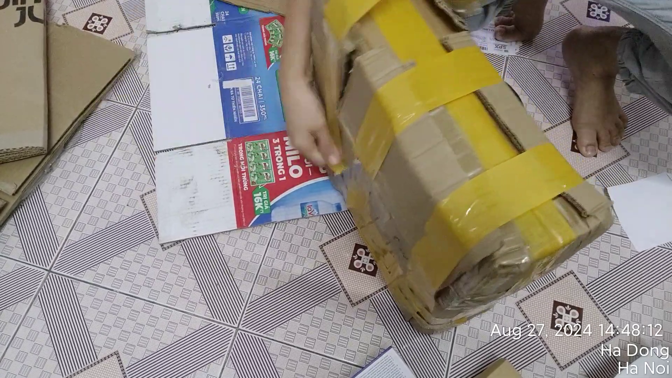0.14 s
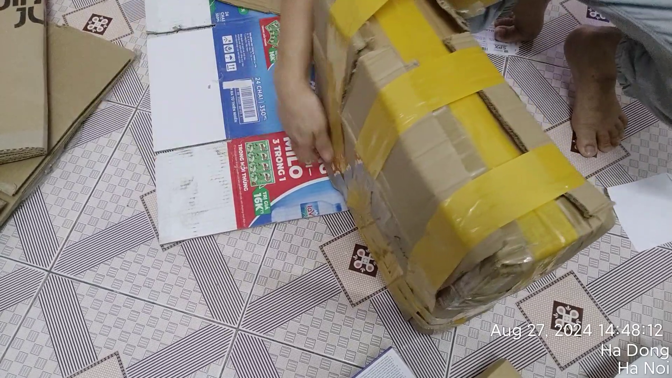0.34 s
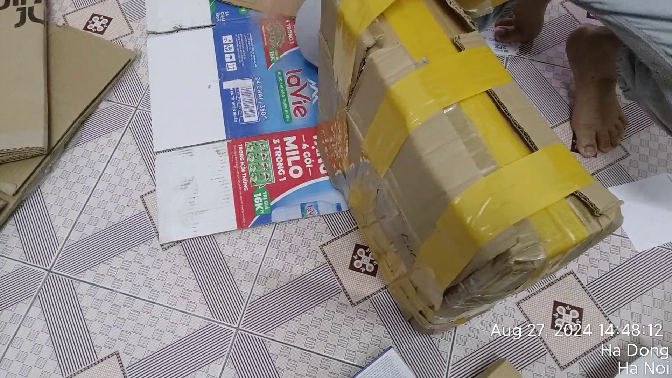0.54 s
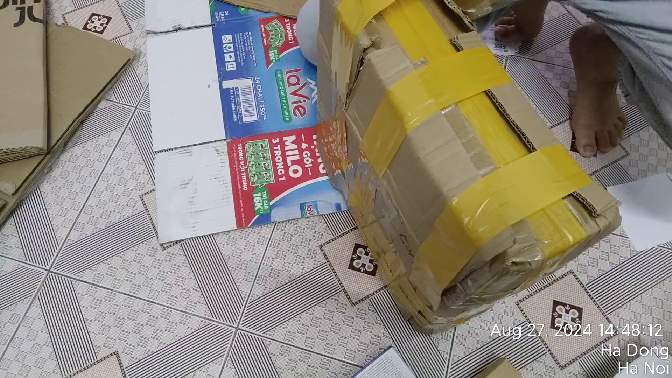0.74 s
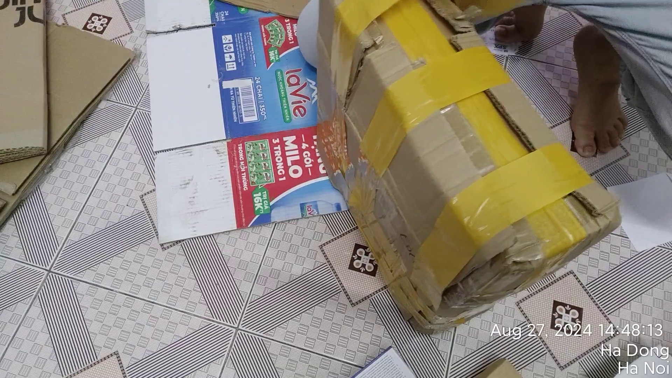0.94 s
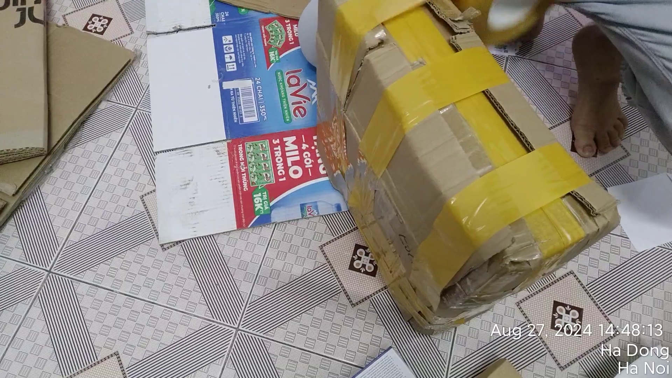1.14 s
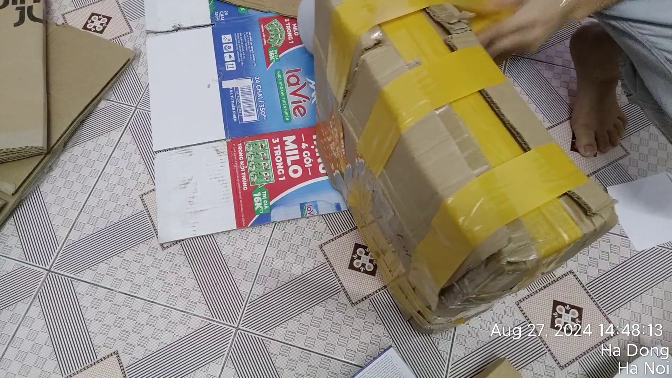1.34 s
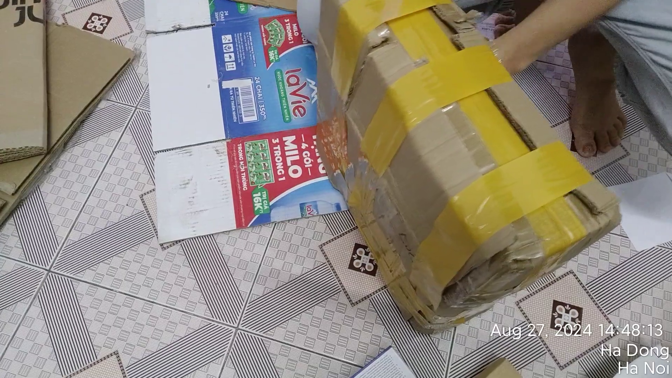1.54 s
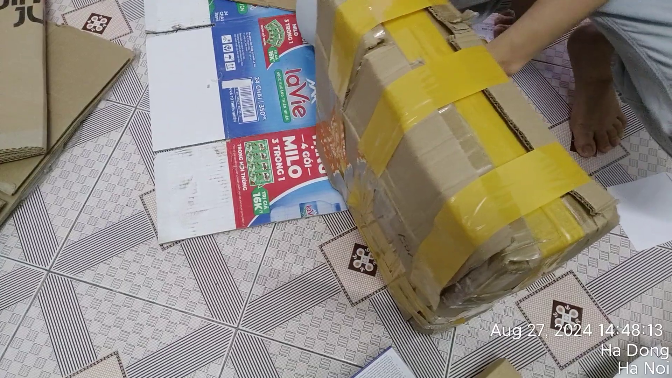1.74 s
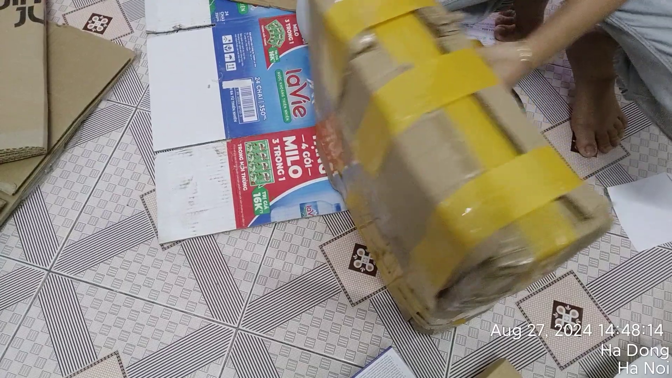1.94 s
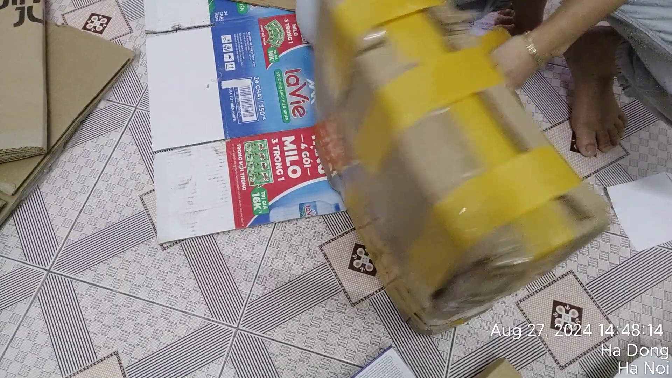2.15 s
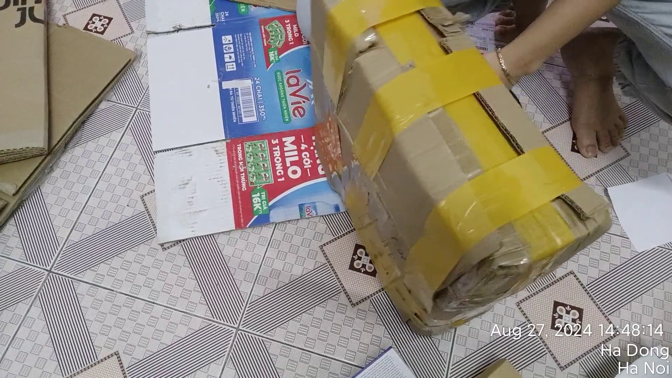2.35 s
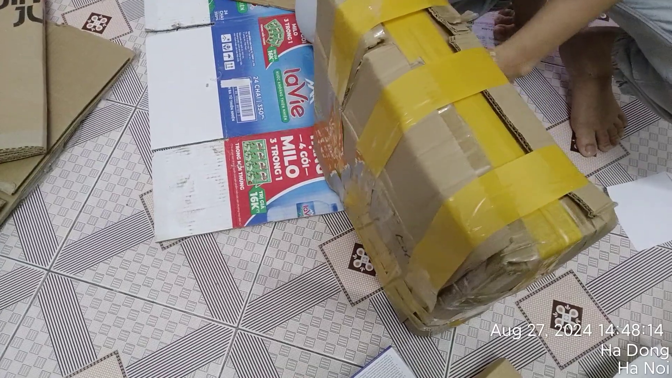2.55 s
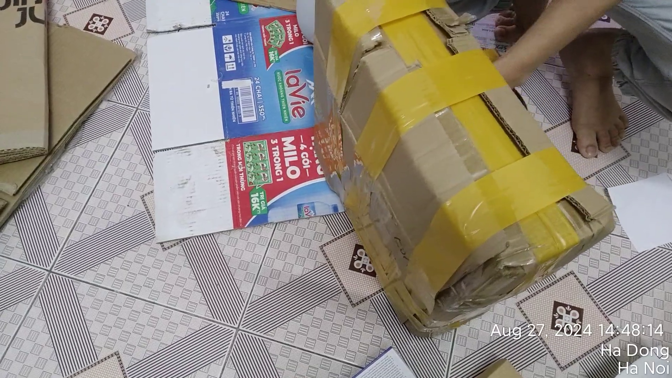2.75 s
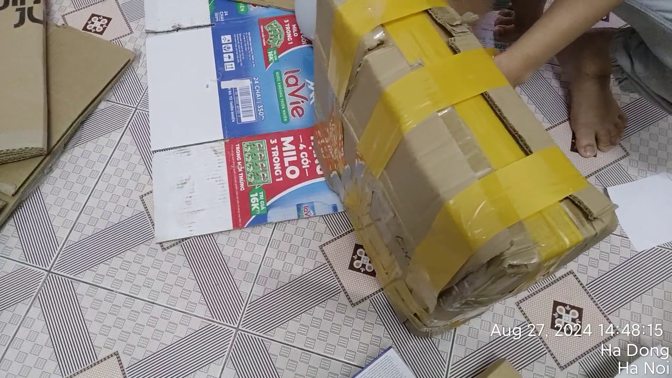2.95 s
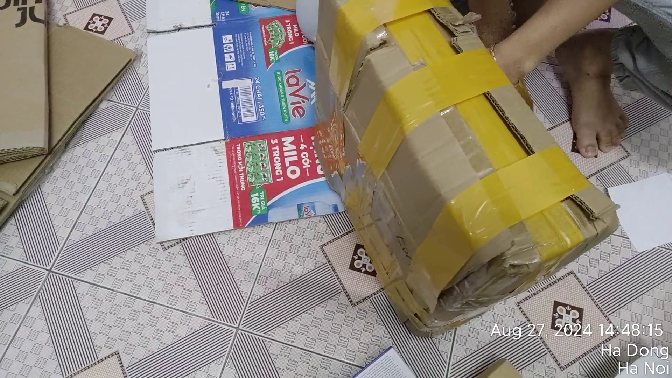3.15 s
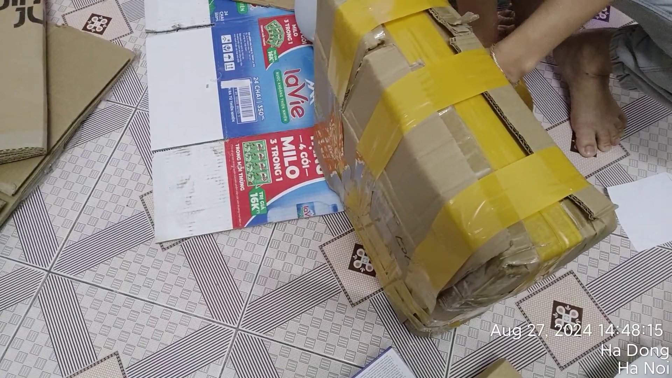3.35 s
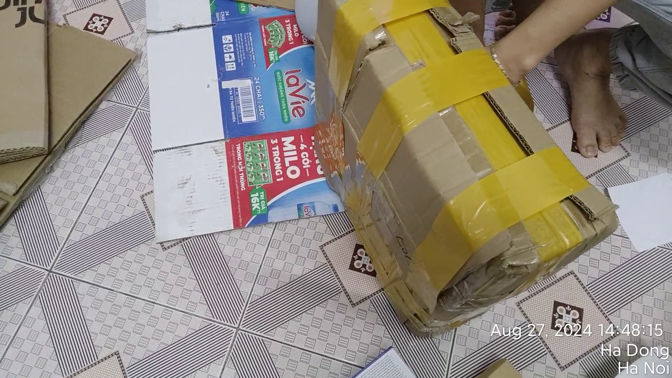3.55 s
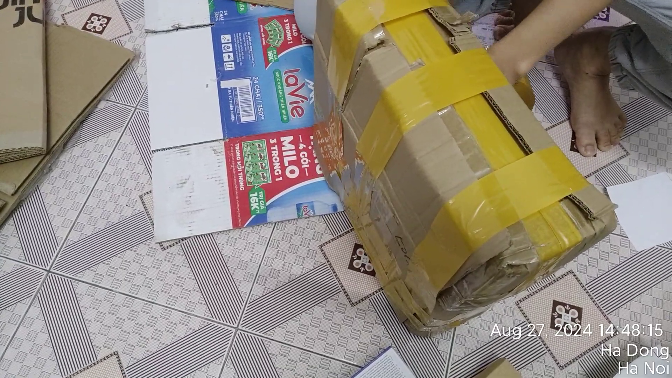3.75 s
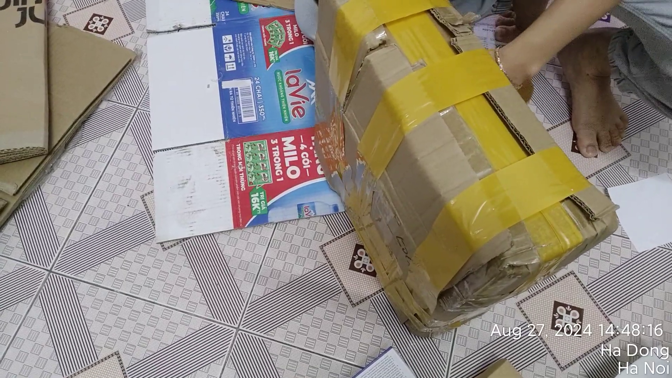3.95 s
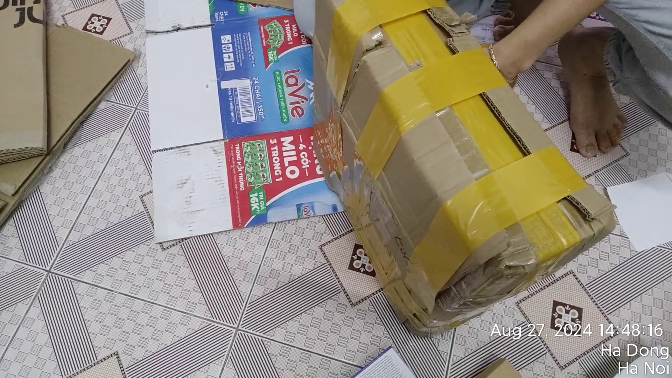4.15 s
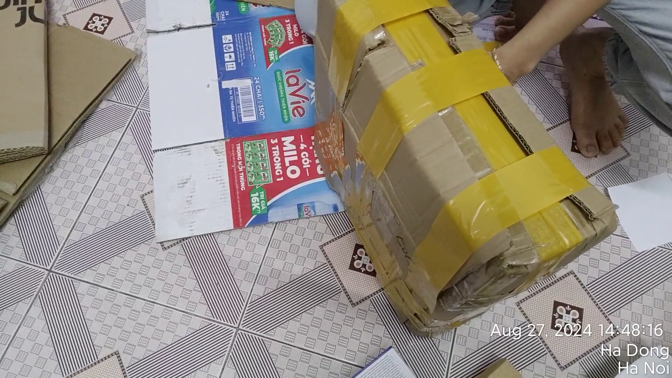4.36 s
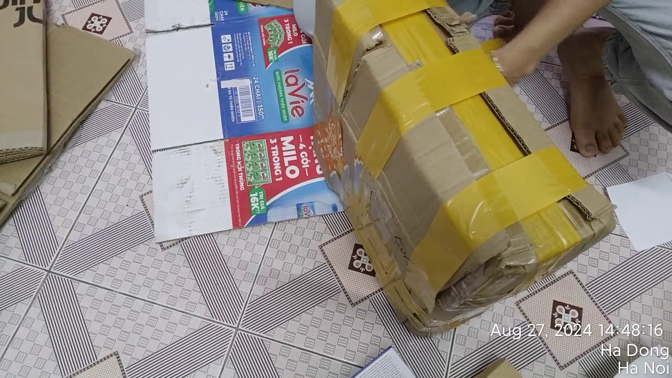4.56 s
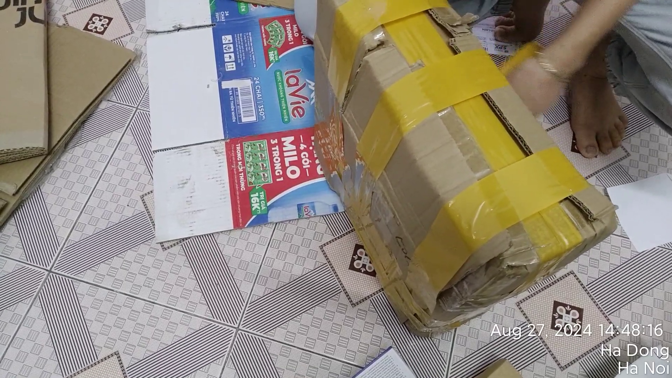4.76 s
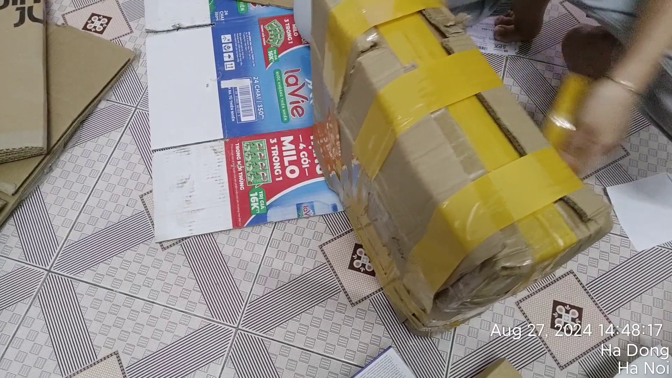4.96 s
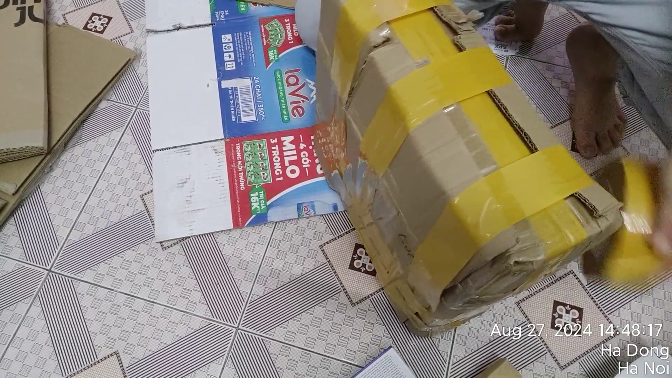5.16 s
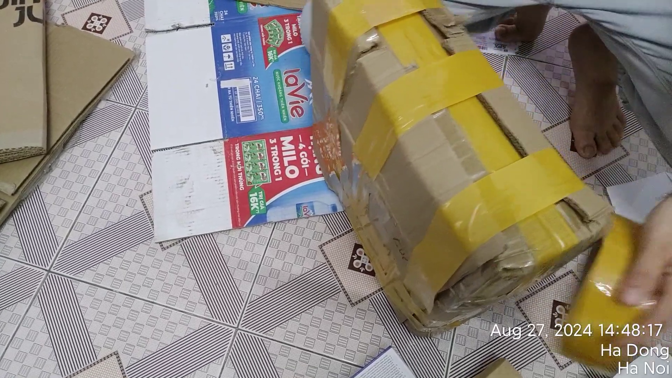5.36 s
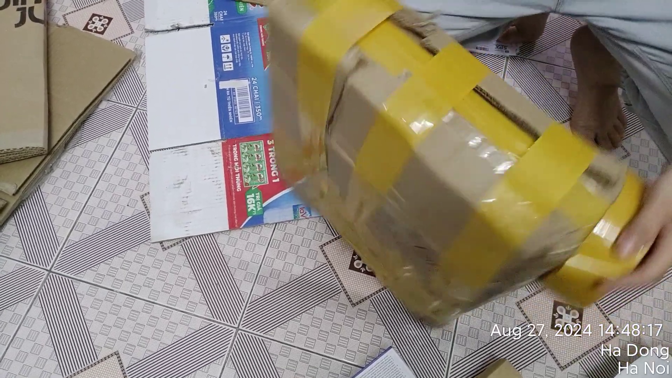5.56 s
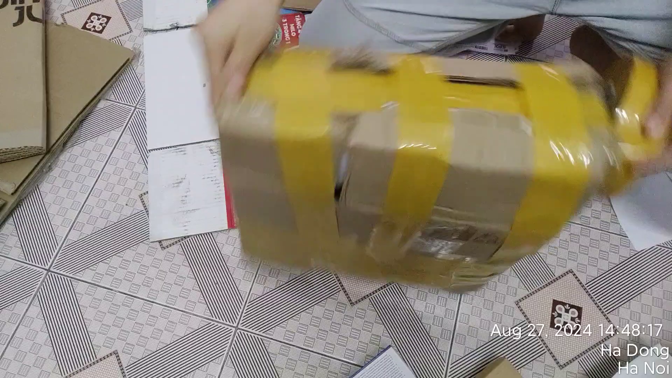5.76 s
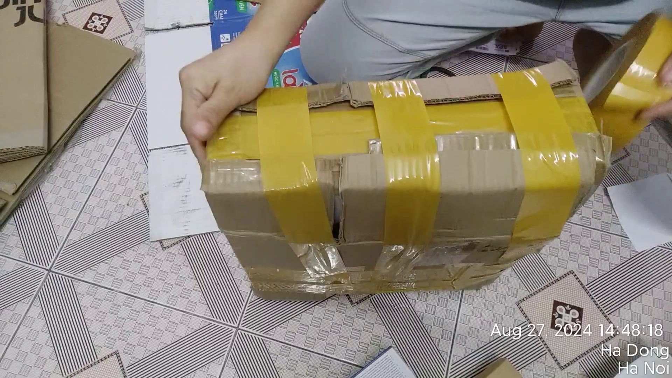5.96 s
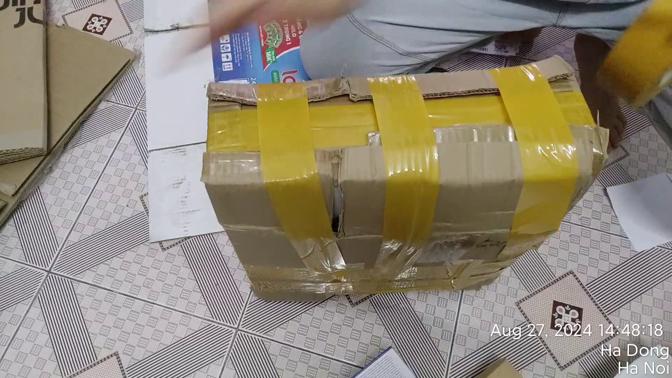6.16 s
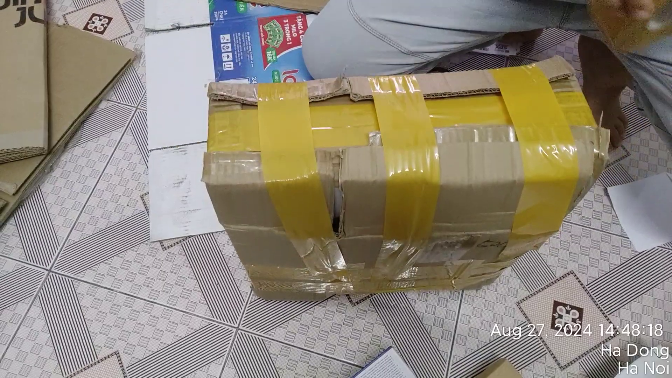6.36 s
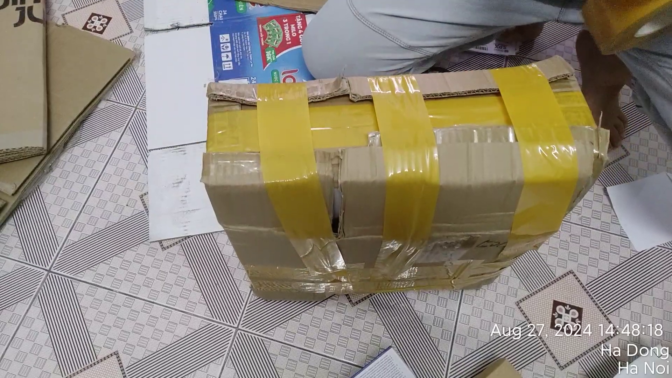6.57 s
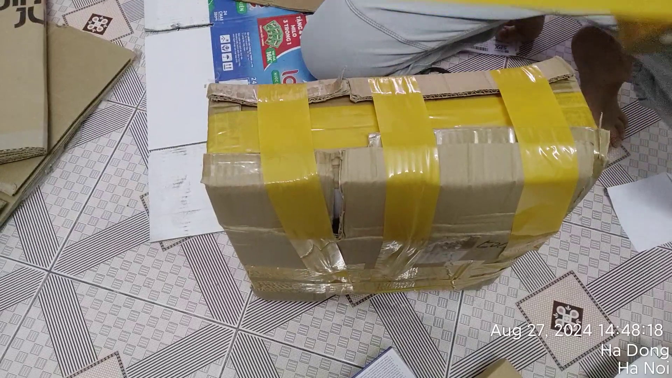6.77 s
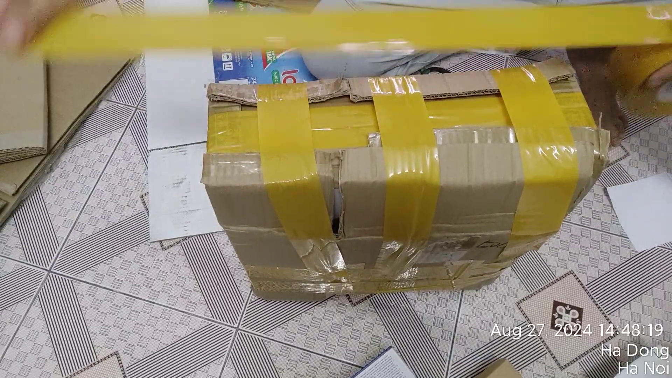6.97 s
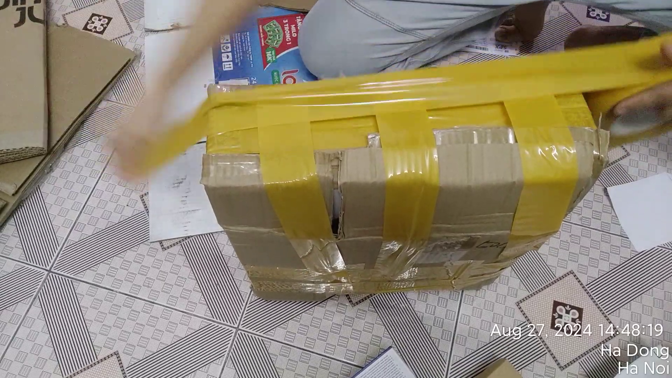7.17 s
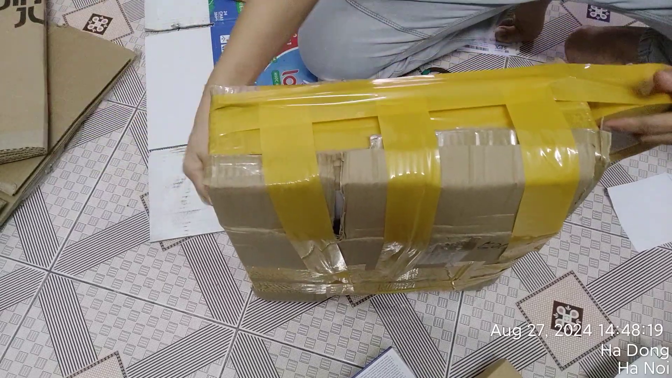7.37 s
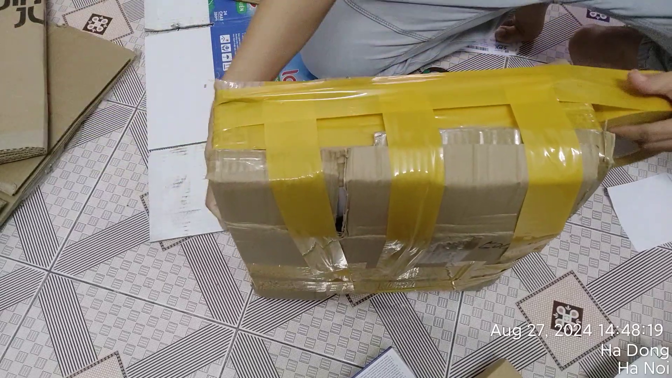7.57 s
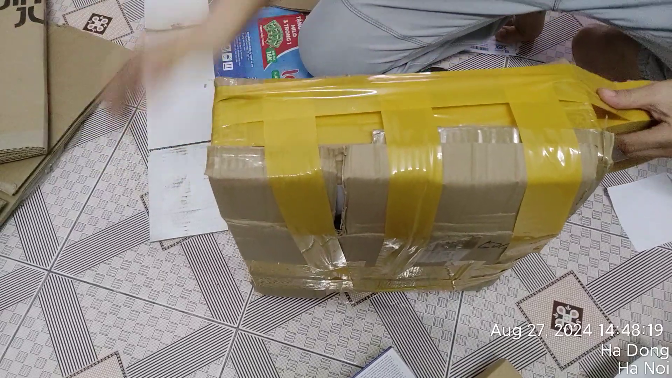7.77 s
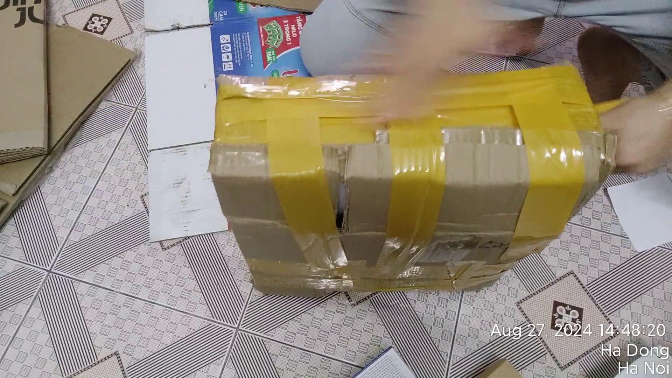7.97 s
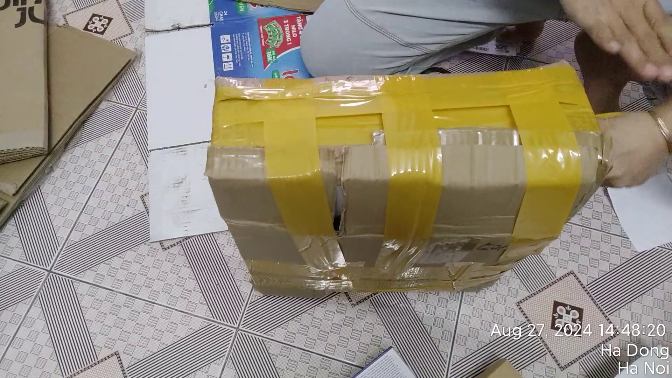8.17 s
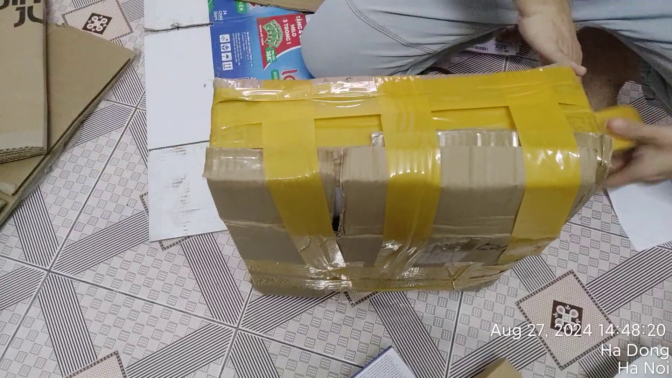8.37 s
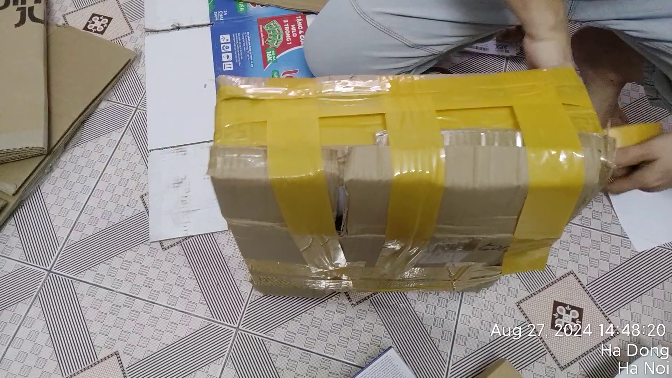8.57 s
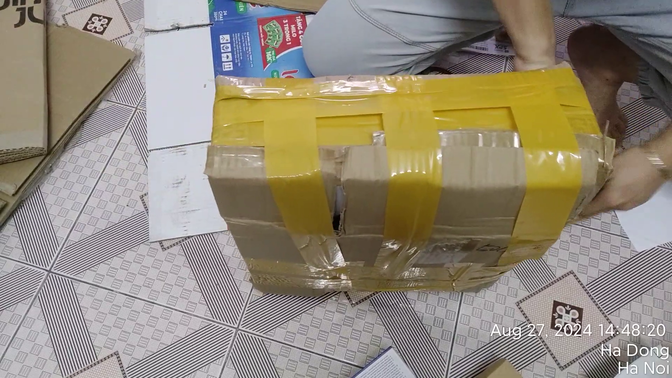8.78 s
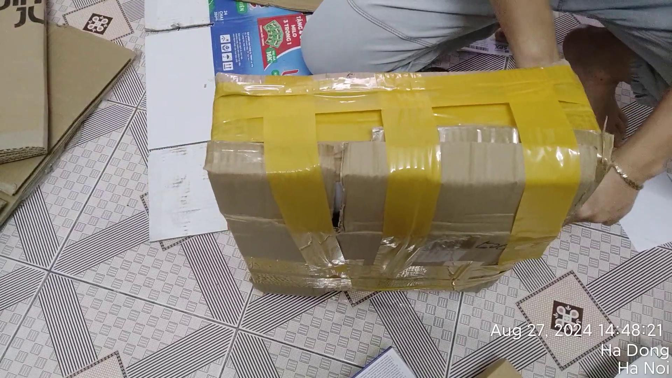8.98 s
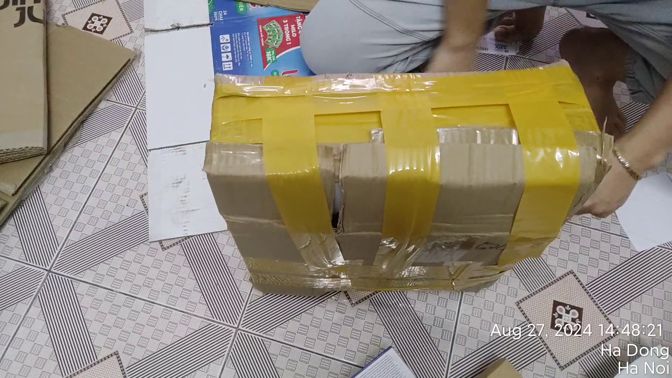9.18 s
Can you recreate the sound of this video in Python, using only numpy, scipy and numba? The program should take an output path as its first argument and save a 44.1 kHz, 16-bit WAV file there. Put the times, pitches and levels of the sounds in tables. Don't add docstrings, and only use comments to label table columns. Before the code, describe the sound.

Close phone pickup in a small hard room, with faint steady fan air, low hum and handling rumble throughout. A short tail of a tape rip opens, with a light crack near 0.3 s, then near quiet. From about 1.0 s snaps start, becoming loud, separate cracks at 1.15-1.5 s, then fast chatter to 1.75 s. Crackly rubbing and shorter rips follow at 2.0-2.75 s with hollow cardboard bumps. From 2.85 to 5.0 s, sparse bright fingernail ticks ring the tape roll, strongest near 3.35 s and clustering around 4.9 s. Soft bumps and faint rustles mark the box being turned until 6.1 s. At 6.65 s a dense, harsh rip bursts and fades by 7.0 s. Quiet pressing follows, then big cracks and a rip at 7.9-8.15 s, scattered snaps, rapid chatter at 8.6-8.95 s, and last small crackles near 9.1 s.

```python
import sys
import numpy as np
from scipy import signal
from scipy.fft import rfft, irfft, next_fast_len
from scipy.io import wavfile
from scipy.ndimage import uniform_filter1d
from numba import njit

SR = 44100
rng = np.random.default_rng(int(sys.argv[2]) if len(sys.argv) > 2 else 0)


def waveform_to_disk(signal):
    frames = np.transpose(np.atleast_2d(signal))
    scaled = np.clip(frames, -1, 1) * 32767
    samples = np.round(scaled).astype(np.int16)
    wavfile.write(sys.argv[1], SR, samples)


def gain_from_db(level_db):
    decades = np.asarray(level_db, float) / 20
    return 10 ** decades


N = 407043


def level(x, db):
    return x * gain_from_db(db) / np.sqrt(np.mean(x ** 2))


@njit
def svf(x, hz, width_hz):
    y, b, l = np.empty(len(x)), 0., 0.
    for i in range(len(x)):
        g, k = np.tan(np.pi * hz[i] / SR), width_hz / hz[i]
        v = (b + g * (x[i] - l)) / (1 + g * (g + k))
        b, l, y[i] = 2 * v - b, l + 2 * g * v, k * v
    return y


def band(x, hz, width_hz):
    return svf(x, hz + np.zeros(N), 1. * width_hz) * np.sqrt(SR / np.pi / width_hz)


def high_pass(x, hz, order):
    return signal.sosfilt(signal.butter(order, hz, "high", fs=SR, output="sos"), x)


def colour(x, points):
    hz, db = np.transpose(points)
    size = next_fast_len(N)
    bin_hz = np.arange(size // 2 + 1) * SR / size
    gain = gain_from_db(np.interp(np.log(bin_hz + 1), np.log(hz), db))
    return irfft(rfft(x, size) * level(gain, 0), size)[..., :N]


def walk(rate_hz):
    k = int(SR / rate_hz)
    steps = np.repeat(rng.standard_normal(N // k + 1), k)
    return 1.92 * uniform_filter1d(uniform_filter1d(steps, k), k)[:N]


def crackle(spread_db):
    sizes_db = spread_db * np.minimum(rng.exponential(size=N), 4)
    return level(rng.standard_normal(N) * gain_from_db(sizes_db), 0)


def held(s, values):
    return values[np.maximum(np.searchsorted(s - .002, np.arange(N) / SR) - 1, 0)]


def bursts(s, db, tear_s, tail_s, tail_db):
    spikes = np.zeros((2, N))
    spikes[:, (s * SR).astype(int)] = gain_from_db(db), gain_from_db(db + tail_db)
    t = np.arange(4096) / SR
    attack = np.minimum(t / 0.00039, 1)
    shapes = attack * np.array([np.exp(-(t / tear_s) ** 2), np.exp(-t / tail_s)])
    return signal.fftconvolve(spikes, shapes, axes=1).sum(axis=0)[:N]


def snaps(s, db):
    out = np.zeros(N)
    out[((s + 0.0008) * SR).astype(int)] = gain_from_db(db)
    return out


# hz, density_db_per_hz
FILM_SPECTRUM = [(1470, -28), (2500, -4.5), (3140, 0), (6840, 5), (8390, -8), (9980, -8), (12700, -14),
                 (14400, -17.5), (15400, -43), (16400, -64)]


def film(push):
    return colour(push, FILM_SPECTRUM)


# mode_hz, width_hz, level_db
BOX_MODES = [(273, 50, -5), (402.4, 46, 4), (523, 340, 2), (700, 72, 1.5), (800, 860, -10.5)]


def box(push):
    ring = 0
    for k, (hz, width_hz, db) in enumerate(BOX_MODES):
        ring = ring + (-1) ** k * gain_from_db(db - 8.0) * band(push, hz, width_hz)
    return high_pass(ring, 187, order=3)


def knock(s, db):
    return band(bursts(s, db - 1, 0.00042, 0.023, -99), 593, 390)


LOW_EDGES_HZ = (90, 420, 780, 1000)


def low_edge(x, shortness):
    place = shortness * (len(LOW_EDGES_HZ) - 1)
    out = 0
    for k, hz in enumerate(LOW_EDGES_HZ):
        share = np.maximum(1 - np.abs(place - k), 0)
        out = out + share * high_pass(x, hz, order=4)
    return out


# start_s, fastest_s, end_s, fastest_film_db, end_film_db
RIPS = [(-0.04, 0.001, 0.061, -14.5, -44), (1.527, 1.62, 1.74, -24.5, -32), (1.796, 1.776, 2.1, -41, -48.5),
        (2.071, 2.093, 2.178, -20.5, -34.5), (2.195, 2.257, 2.27, -26.5, -39),
        (2.309, 2.376, 2.37, -18, -27), (2.389, 2.436, 2.522, -27.5, -38), (2.575, 2.58, 2.773, -20.5, -41),
        (5.797, 5.947, 5.99, -53, -64.5), (6.651, 6.659, 6.68, -21.5, -22), (6.68, 6.673, 7, -14, -18.5),
        (7.295, 7.413, 7.66, -59.5, -76), (8.021, 8.11, 8.11, -15, -21.5), (8.298, 8.41, 8.56, -30, -52),
        (8.537, 8.548, 8.52, -27, -40), (8.592, 8.602, 8.96, -25.5, -37),
        (8.886, 8.974, 9.13, -33.5, -50.5)]
# start_ring_hz, end_ring_hz, strip_db, flap_db, start_shortness_0_to_1
RIP_STRIPS = [(940, 2660, -2.5, -3, 0.09), (2000, 1900, -5.5, -34, 0), (2030, 1600, 0, -8, 0.6),
              (1140, 1600, 0, -6, 0), (1350, 1300, 1.5, 1.5, 0.07), (2500, 2730, 6, -23, 0.9),
              (3900, 3200, -8, -4.5, 0.76), (1360, 1200, 1.5, -1.5, 0.11), (1300, 1200, 3, -5, 0.1),
              (1150, 1250, -1.5, -8, 0.97), (1130, 1180, 1, -8.5, 0.57), (1300, 1820, 4, 7, 0.1),
              (1480, 1900, 5.5, -15.5, 0.34), (1770, 1400, -0.5, -16, 0.14), (2300, 1500, -1.5, 0, 0.01),
              (1800, 2700, -9, 0, 0.11), (2150, 2400, 4.5, -9.5, 0)]
# left_minus_right_db, left_lag_samples, sizzle_db
RIP_PLACES = [(-1.5, 11, -14.5), (-1, -2, -8), (7, -1.5, -26), (5.5, -3, -16), (8, -3, -16), (5.5, -5, -30),
              (4, -2, -24), (4, -2.5, -14.5), (2, -1, -4), (4, -4, -10), (1.5, -4, -11.5), (-2, 8, -26),
              (1, -6.5, -11), (5, -8.5, -31), (9.5, -9, -11), (7, -4, -17), (10, -5.5, -10)]


def rips():
    rise_db, release_s, slacken_db_per_s = 10.5, 0.029, 23
    flap_base_hz, taut_flap_hz = 400, 90
    short_flap_hz, short_flap_db, lengthen_s = 496, -30, 0.068
    surge_per_db, even_at_db = 0.2, -13
    t = np.arange(N) / SR
    skin, strip, body, pan_db, lag, surge_db, sizzle_db, shortness = np.zeros((8, N))
    ring_hz, flap_hz = np.full(N, 1500.), np.full(N, 500.)
    for rip, free_strip, place in zip(RIPS, RIP_STRIPS, RIP_PLACES):
        start, fastest, end, db, end_db = rip
        hz, end_hz, strip_db, flap_db, short = free_strip
        on = t >= start
        now, age = t[on], t[on] - start
        edge = np.minimum(age / 0.0015, 1) * np.exp(-np.maximum(now - end, 0) / release_s)
        skin[on] = edge * gain_from_db(np.interp(now, (start, fastest, end), (db - rise_db, db, end_db)))
        slack_db = slacken_db_per_s * (0.5 + short) * np.minimum(age, end - start)
        strip[on] = skin[on] * gain_from_db(strip_db - slack_db)
        stub = np.clip(short, 0, 1) * np.exp(-(age / lengthen_s) ** 2)
        shortness[on] = stub
        body[on] = skin[on] * gain_from_db(flap_db + short_flap_db * stub)
        ring_hz[on] = np.interp(now, (start, end), (hz, end_hz))
        flap_hz[on] = flap_base_hz + taut_flap_hz * short + short_flap_hz * stub
        surge_db[on] = np.clip(surge_per_db * (even_at_db - db), 0, 2.5)
        pan_db[on], lag[on], sizzle_db[on] = place
    threads = crackle(spread_db=2.0) * gain_from_db(surge_db * (walk(110) + 0.43 * walk(450)))
    ring = svf(band(threads * strip, ring_hz * (1 + .02 * walk(40)), 480), ring_hz, 1100.)
    hump = svf(band(threads * strip, 1300 + 0.47 * ring_hz, 3100), 1300 + 0.46 * ring_hz, 3900.0)
    flap = svf(band(threads * body, flap_hz, 560), flap_hz, 710.0)
    free = low_edge(gain_from_db(-5.5) * ring + gain_from_db(-1.5) * hump - gain_from_db(2.5) * flap, shortness)
    sizzle = band(threads * skin * gain_from_db(sizzle_db), 8950, 5300)
    return gain_from_db(-1.0) * film(threads * skin) + free + sizzle, pan_db, lag


# time_s, rumble_db
HANDLING = [(0.0, -64), (.97, -60.5), (1.8, -53.5), (2.52, -53.5), (3.08, -67), (3.8, -79), (4.19, -60.5),
            (5.01, -56.5), (5.4, -53.5), (5.78, -50.5), (6.22, -61), (6.84, -62.5), (7.14, -81),
            (7.89, -59.5), (8.1, -63), (9.23, -72)]
# time_s, peak_db, pitch_hz
BUMPS = [(1.357, -35, 400), (1.407, -34, 390), (1.451, -31, 400), (1.49, -33.5, 400), (2.191, -24, 370),
         (2.238, -18, 363), (2.415, -26.5, 457), (3.859, -50, 80.4), (4.349, -38.5, 431),
         (4.66, -36.5, 525), (5.015, -25.5, 280), (5.426, -57, 141), (5.447, -43, 242), (5.484, -45, 287),
         (5.656, -43, 132), (5.719, -41, 248), (5.739, -46, 83.4), (5.937, -41.5, 490), (6.01, -44, 87),
         (6.139, -51, 146), (7.37, -31.5, 473), (8.035, -23, 330), (8.66, -35, 290), (8.74, -39, 262),
         (8.82, -35, 280), (8.9, -34, 262), (8.95, -42, 270), (9.001, -39, 270), (9.03, -44, 267)]


def handling(tape):
    s, db = np.transpose(HANDLING)
    thud = gain_from_db(np.interp(np.arange(N) / SR, s, np.minimum(db, -48)))
    rumble = []
    for side in (1, -1):
        gusts = rng.standard_normal(N) * gain_from_db(3.1 * walk(58))
        rumble.append(gain_from_db(2.0 * side) * band(gusts, 40, 76))
    settle_s = 0.047
    keep = np.exp(-1 / (settle_s * SR))
    moved_db = 10 * np.log10(signal.lfilter([1 - keep], [1, -keep], tape ** 2) + 1e-12)
    rustle = gain_from_db(np.minimum(-17.5 + 0.77 * moved_db, -53.5))
    creaks = gain_from_db(-5.5 + 0.88 * walk(40)) * film(rng.standard_normal((2, N)))
    s, db, hz = np.transpose(BUMPS)
    hits = rng.standard_normal(N) * bursts(s, db, 0.0072, 0.029, -1.5)
    bumps = gain_from_db(-5) * band(hits, held(s, hz), 123)
    return thud * np.array(rumble) + rustle * creaks + bumps


# hz, density_db_per_hz
FAN_SPECTRUM = [(15, -32.5), (25, -10.5), (64, -13), (111, -17.5), (263, -3), (354, -8), (560, -1.5),
                (840, -9), (936, -10), (1260, -10.5), (1370, -14.5), (1520, -14), (4370, -29.5),
                (6560, -34), (16000, -47.5)]


def fan():
    fan_db, pan_db, hum_hz, hum_db = -49, 1, 59, -60
    mid, side = colour(rng.standard_normal((2, N)), FAN_SPECTRUM)
    side = side - band(side, 310, 1000) / np.sqrt(SR / np.pi / 1200)
    phase = 2 * np.pi * np.cumsum(hum_hz + 0.787 * walk(5)) / SR
    hum = np.sin(phase) * gain_from_db(hum_db + 1.6 * walk(2.8))
    air = level(mid + side * np.array([[1], [-1]]), fan_db)
    return air * gain_from_db(0.29 * walk(0.24) + pan_db * np.array([[.5], [-.5]])) + hum


# time_s, peak_db, strip_ring_hz, hand_weight_on_strip_and_box_db
GLUE_CRACKS = [(0.2316, -38.5, 845, 35), (0.257, -18.5, 1210, -14), (0.284, -26, 3170, -9),
               (0.538, -52, 1030, -7.5), (.797, -53, 1070, 0), (0.8804, -51, 1240, 3),
               (1.0089, -31, 2800, -2), (1.024, -34, 2770, 1), (1.0634, -23, 1620, -3),
               (1.0902, -23, 1640, 3), (1.1641, -5, 1180, -7), (1.177, -22, 2590, 2),
               (1.1906, -9, 2560, -3.5), (1.255, -3, 1900, 1.5), (1.282, -6.5, 1550, -2),
               (1.3205, -4, 1250, -2), (1.3515, -6.5, 1270, 6), (1.404, -8.5, 1230, 5),
               (1.4472, -7, 1350, 5.5), (1.4718, -12.5, 1280, -20), (1.4868, -14, 1350, -17),
               (1.513, -16, 3000, -4),
               (1.944, -32, 1160, -2), (1.9938, -32, 1050, 10), (2.0169, -21.5, 1130, 11),
            (2.0782, -30.5, 1140, 6), (2.1897, -21, 1190, 5), (2.2032, -24, 1300, 14),
            (2.2175, -20.5, 1300, 17), (2.2393, -23.5, 1250, 19), (2.3088, -17.5, 1920, 17.5),
            (2.3357, -10, 2560, 1), (2.4151, -23.5, 1210, 20.5), (2.5688, -33.5, 1170, 7),
            (5.5253, -41.5, 1070, 22), (5.62, -50, 3000, 0), (5.728, -44.5, 3300, 1),
            (5.8063, -38, 934, -16), (5.833, -46, 3000, -5), (5.888, -42, 3300, -1), (5.911, -44, 3000, -8),
            (5.938, -39, 1500, 3), (5.954, -33.5, 1580, -5), (6.012, -47, 2000, -2),
               (6.536, -42, 2000, -6), (6.5706, -34.5, 3280, -2), (6.601, -33, 3170, 1),
           (6.6394, -16.5, 2300, -16), (6.6497, -13, 1140, -26), (7.346, -30, 1100, -5),
           (7.53, -33.5, 1380, 5), (7.5954, -37, 1284, 13.5), (7.877, -32.5, 2500, 2.5),
           (7.896, -7.5, 2090, -8.5), (8.0021, -5, 1620, -7), (8.0244, -7, 1480, 2), (8.2059, -16, 1800, 0),
           (8.31, -35, 1060, -3), (8.362, -25, 1680, -4), (8.4156, -15, 2980, 1), (8.4643, -14.5, 2800, 2),
           (8.525, -20, 2020, 6.5), (8.5454, -21, 1620, -3), (9.059, -16.5, 2910, -2),
           (9.0958, -19.5, 2820, 1)]


def cracks():
    s, db, strip_hz, weight_db = np.transpose(GLUE_CRACKS)
    strip_db, box_db = -11 + 0.52 * weight_db, -13.5 + weight_db
    rustle_db = -24 - 0.46 * db
    threads = crackle(spread_db=2.5)

    def push(part_db):
        tear = threads * bursts(s, db + part_db - 3, 0.0032, 0.024, rustle_db)
        return tear + snaps(s, db + part_db + 16.5)
    strip = push(strip_db)
    pluck = band(strip, held(s, strip_hz), 550) + gain_from_db(-3) * band(strip, 1900, 2200)
    sound = gain_from_db(-5.0) * film(push(0)) + gain_from_db(1.5) * pluck + gain_from_db(-0.5) * box(push(box_db))
    return sound + knock(s, db + box_db)


# time_s, peak_db
CHATTER = [(1.5403, -1.5), (1.5692, -2.5), (1.581, -7), (1.5898, -9), (1.6003, -11.5), (1.6163, -15),
           (1.6459, -8), (1.664, -14), (1.6756, -6), (1.689, -14), (1.704, -13), (8.5994, -3.5),
           (8.6181, -11), (8.6348, 0.5), (8.655, -1.5), (8.6678, -2.5), (8.683, -2), (8.713, -5),
           (8.736, -6), (8.7533, -19), (8.767, -6), (8.779, -26), (8.79, -12), (8.799, -26), (8.8462, -10),
           (8.857, -12), (8.9021, -14), (8.9202, -14), (8.931, -18.5), (8.9412, -17), (8.976, -20)]


def chatter():
    s, db = np.transpose(CHATTER)
    strip_db, box_db = -14 + 0.5 * db, -7.5 + db
    threads = crackle(spread_db=2.5)
    skin, strip, body = (threads * bursts(s, d, 0.0025, 0.025, -15.5) for d in (db, strip_db, box_db))
    sound = gain_from_db(-9.0) * film(skin) + gain_from_db(1.0) * band(strip, 1800, 1150) + gain_from_db(-19) * box(body)
    return sound + knock(s, box_db - 6.5)


# time_s, peak_db
SNATCHES = [(2.11, -13), (2.131, -17), (6.681, -15), (6.69, -11), (6.696, -10), (6.725, -5.5), (6.73, -9),
            (6.772, -7), (6.814, -10), (8.05, -3), (8.055, -10), (8.063, -5.5), (8.092, -8), (8.1, -10),
            (8.112, -7), (8.1183, -6.5), (8.123, -11), (8.132, -11), (8.137, -3), (8.142, -13)]


def quick_slips():
    s, db = np.transpose(SNATCHES)
    push = snaps(s, db + 15) + crackle(spread_db=2.5) * bursts(s, db - 5.5, 0.0019, 0.01, -18)
    return gain_from_db(-5.5) * film(push) + gain_from_db(-10) * band(push, 1500, 1500) + gain_from_db(-19) * box(push)


# time_s, peak_db, strip_db, box_db, rustle_db
PICKS = [(2.85, -26.5, -14.5, -16.5, -2), (2.894, -32.5, -11.5, -22.5, 6.5), (3.27, -17.5, -31, -19, -9),
         (3.3442, -4.5, -19, -23, -8), (3.7015, -9.5, -21.5, -30.5, -5.5), (3.903, -13, -27, -23.5, -22),
         (4.221, -42.5, 6, 4.5, -20), (4.2714, -40, 0.5, -13, -10), (4.3951, -26.5, -8.5, -8, -7),
         (4.5833, -18.5, -16, -26, -3.5), (4.6718, -28, -13, -16.5, -8.5), (4.7539, -35.5, 4.5, -20, -9),
         (4.8343, -30.5, -7.5, -34, -9), (4.8878, -25, -24, -31, -3.5), (4.9098, -10.5, -28.5, -22.5, -5.5),
         (4.929, -13, -19.5, -34, -7), (4.947, -11.5, -43, -40, -14), (4.9618, -9.5, -28, -26, -11.5),
         (5.009, -13, -62, -16, -3.5)]
# mode_hz, width_hz, level_db
ROLL_MODES = [(3400, 31, -28.5), (5050, 57, 0), (5395, 27, -2.5), (6140, 46, 0), (6920, 81, -5),
              (8040, 120, -2), (8560, 38, -7), (9720, 220, -6), (11400, 29, -22)]
# time_s, peak_db, ring_hz
TAPE_END = [(2.8524, -26, 6760), (2.8918, -23, 7830), (3.2685, -16, 5440), (3.3448, 4, 5200),
            (3.7015, -13, 6230), (3.904, -15, 7050), (4.3964, -22, 5570), (4.5835, -4, 6400),
            (4.6723, -29, 6800), (4.7541, -26, 1890), (4.8349, -29, 6520), (4.8873, -10, 6620),
            (4.9107, -9, 6650), (4.9447, -8, 6830)]


def picks():
    s, db, strip_db, box_db, rustle_db = np.transpose(PICKS)
    threads = crackle(spread_db=3.5)
    skin, strip, body = (threads * bursts(s, db + d, 0.0039, 0.038, rustle_db) for d in (0, strip_db, box_db))
    end_s, _, end_hz = np.transpose(TAPE_END)
    roll = gain_from_db(-16.5) * band(skin, held(end_s, end_hz), 450)
    for k, (hz, width_hz, mode_db) in enumerate(ROLL_MODES):
        roll = roll + (-1) ** k * gain_from_db(mode_db - 14.5) * band(skin, hz, width_hz + 110)
    bright = gain_from_db(-12.0) * film(skin) + gain_from_db(-22) * band(skin, 12900, 5000)
    return bright + roll + gain_from_db(-1.0) * band(strip, 1740, 1600) + gain_from_db(3.5) * box(body)


def placed(sound, pan_db, lag):
    def later(samples):
        return sound[np.clip(np.arange(N) - np.round(samples).astype(int), 0, N - 1)]
    direct = np.array([later(lag) * gain_from_db(pan_db / 2), sound * gain_from_db(-pan_db / 2)])
    echoes = np.zeros((2, N))
    for port, paths in enumerate(rng.uniform(25, 150, (2, 6))):
        for sign, path in zip((1, -1, 1, -1, -1, 1), paths):
            echoes[port] += sign * later(path + 9 * walk(6))
    echoes = high_pass(echoes, 770, order=2) * gain_from_db(pan_db * np.array([[.5], [-.5]]))
    return 0.72 * (direct + 0.37 * echoes)


@njit
def walls(x, lags, gain, damp):
    line, soft, out = np.zeros((8, 4096)), np.zeros(8), np.zeros((2, len(x)))
    for i in range(len(x)):
        total = 0.
        for k in range(8):
            soft[k] += (1 - damp) * (gain[k] * line[k, (i - lags[k]) & 4095] - soft[k])
            total += soft[k]
            out[k % 2, i] += soft[k] * (1 - (k & 2))
        for k in range(8):
            line[k, i & 4095] = x[i] + soft[k] - total / 4
    return out


def scene():
    lag = -5
    parts = [rips(), (cracks(), 3.5, lag), (chatter(), 1.5, lag), (quick_slips(), 3.0, lag), (picks(), 4.5, lag)]
    near = sum(placed(*part) for part in parts)
    tape = sum(part[0] for part in parts)
    t60_s, room_db = 0.46, -14
    lags = np.array([433, 571, 709, 863, 1021, 1213, 1427, 1601])
    room = walls(tape + 1e-18, lags, gain_from_db(-60 * lags / SR / t60_s), 0.055)
    left, right = high_pass(near + gain_from_db(room_db) * room, 177, order=4)
    side = high_pass(left - right, 610, order=1)
    return (left + right + side * np.array([[1], [-1]])) / 2 + handling(tape) + fan()


def low_pass(x):
    return signal.sosfilt(signal.butter(12, 16520, fs=SR, output="sos"), x)


def record(dry):
    soft = .95 * np.tanh(dry / .95)
    top = signal.ellip(8, .2, 40, 16000, fs=SR, output="sos")
    return low_pass(signal.sosfilt(top, soft))


dry = scene()
out = record(dry)
waveform_to_disk(out)
```